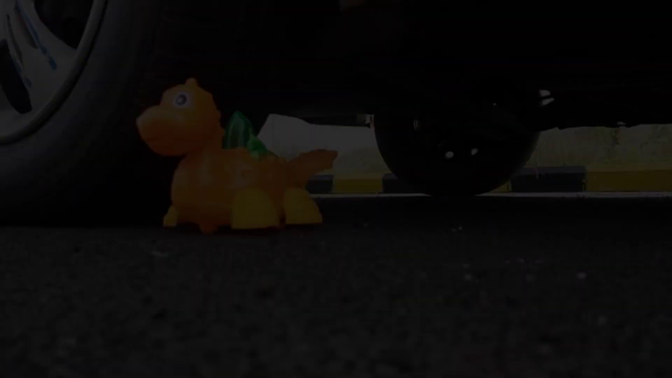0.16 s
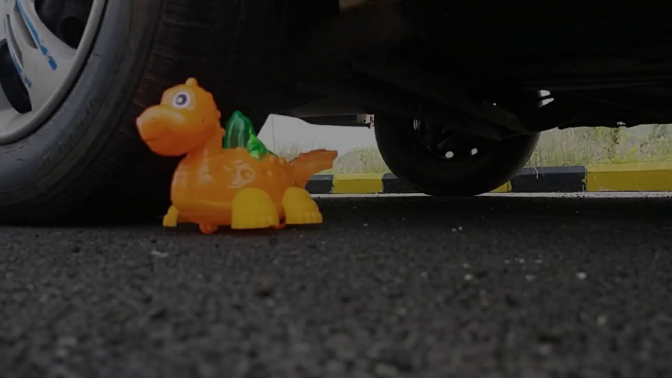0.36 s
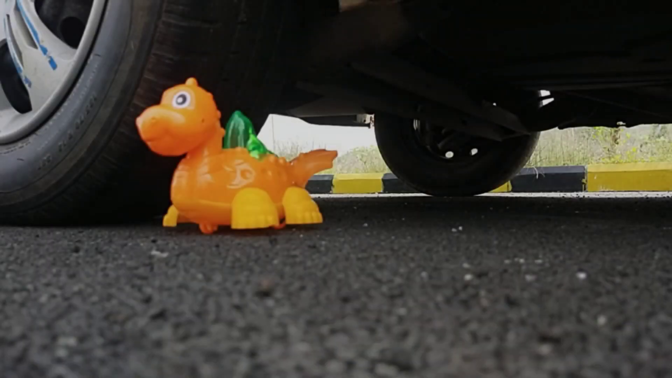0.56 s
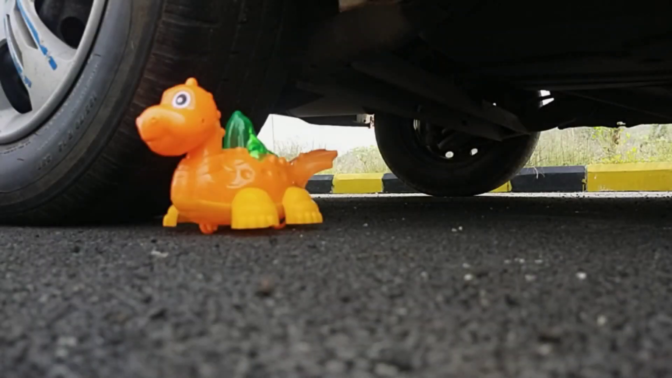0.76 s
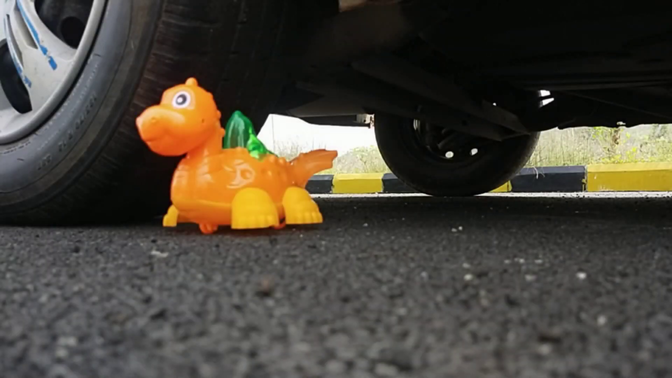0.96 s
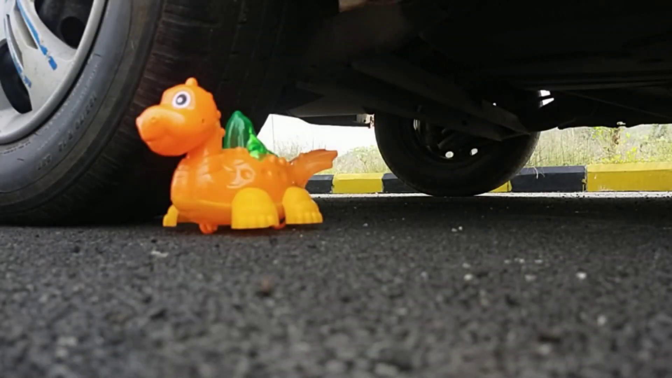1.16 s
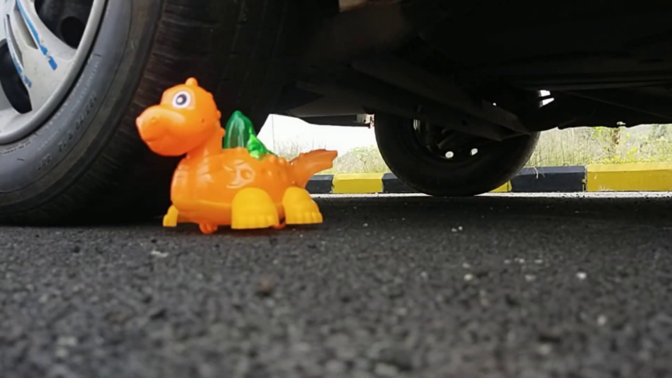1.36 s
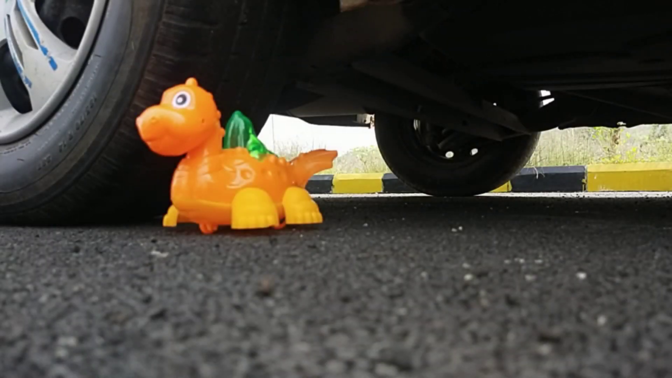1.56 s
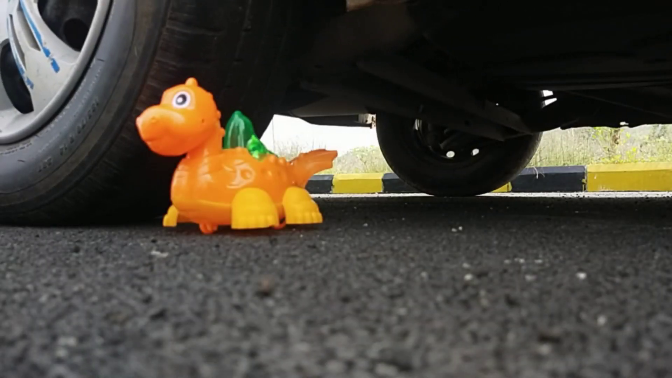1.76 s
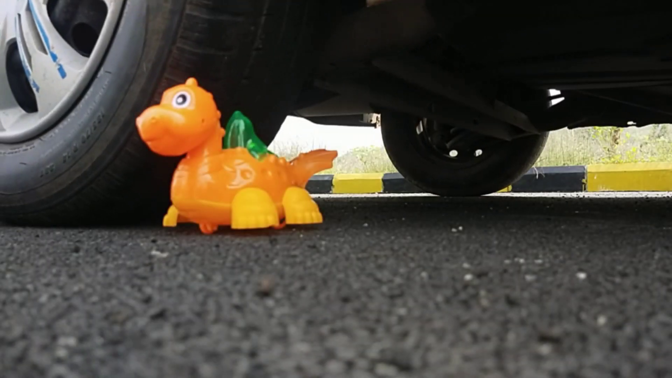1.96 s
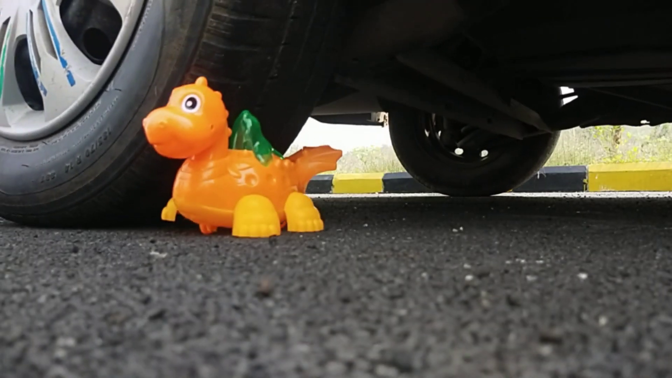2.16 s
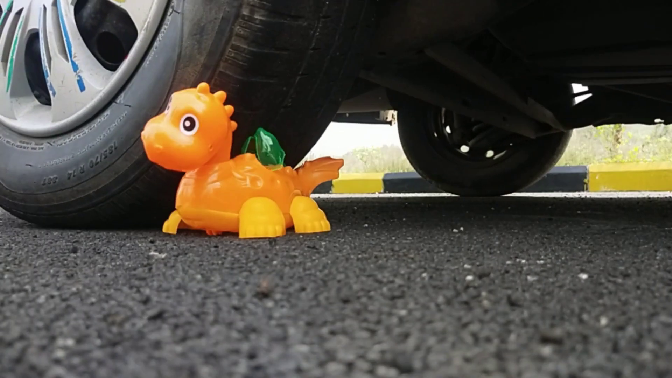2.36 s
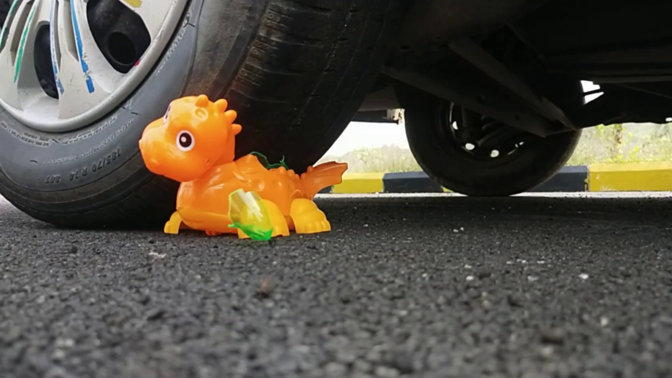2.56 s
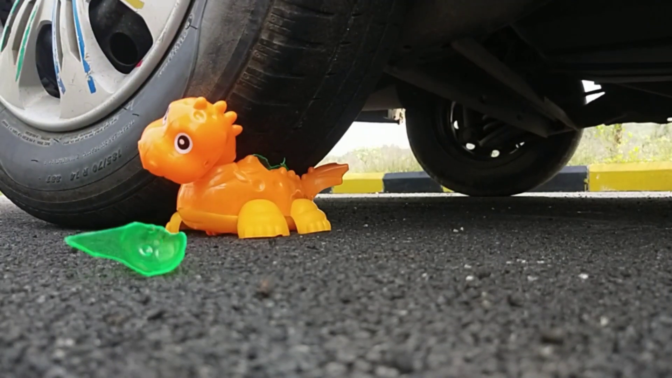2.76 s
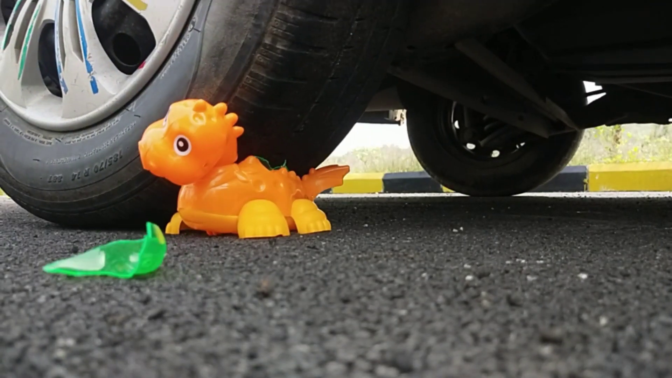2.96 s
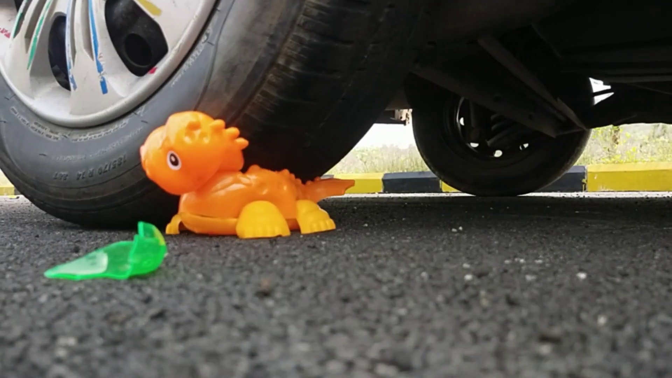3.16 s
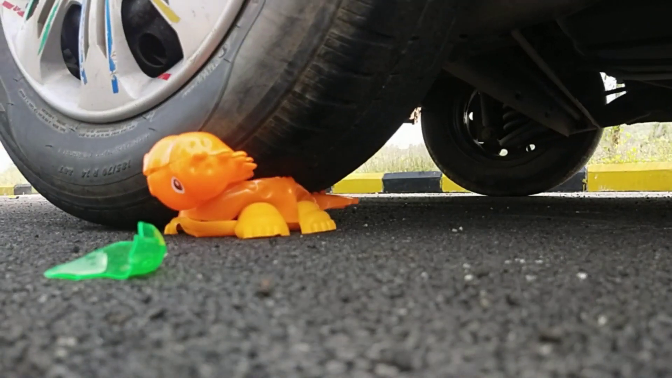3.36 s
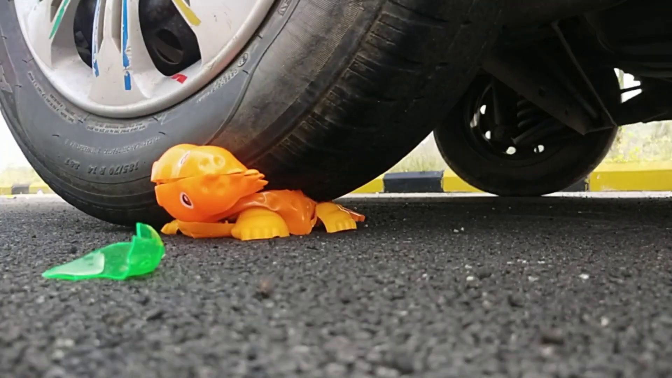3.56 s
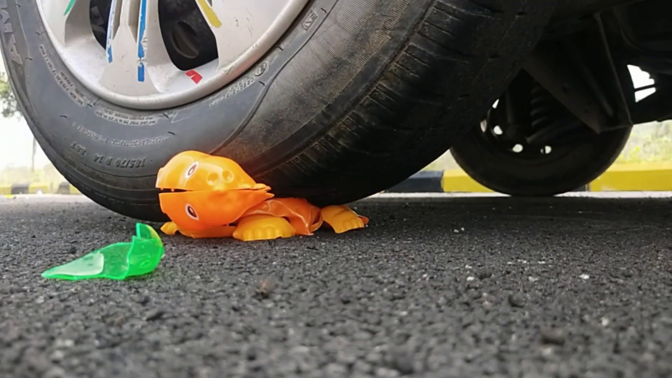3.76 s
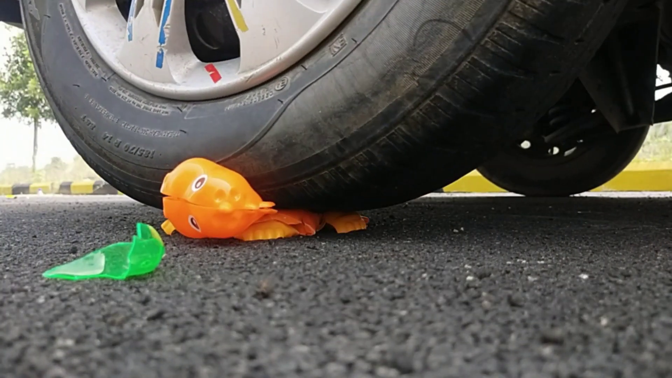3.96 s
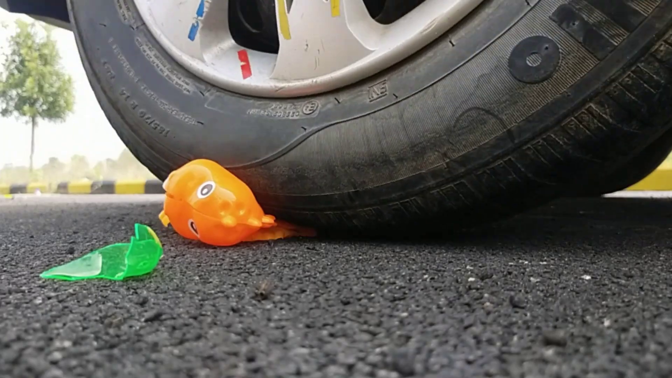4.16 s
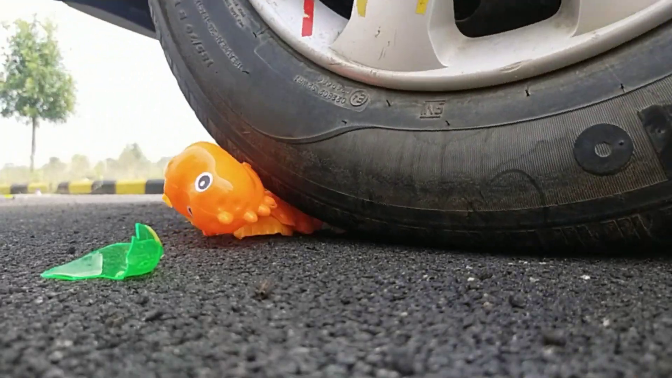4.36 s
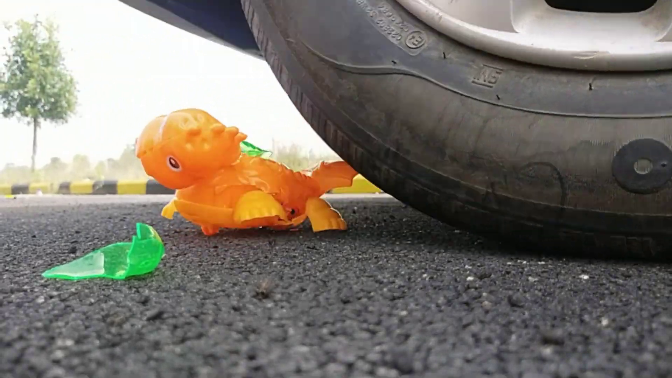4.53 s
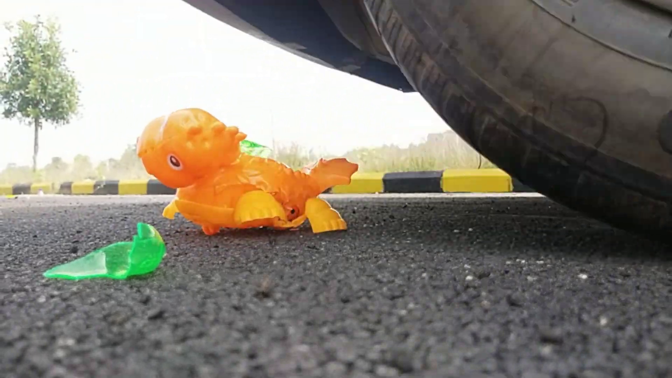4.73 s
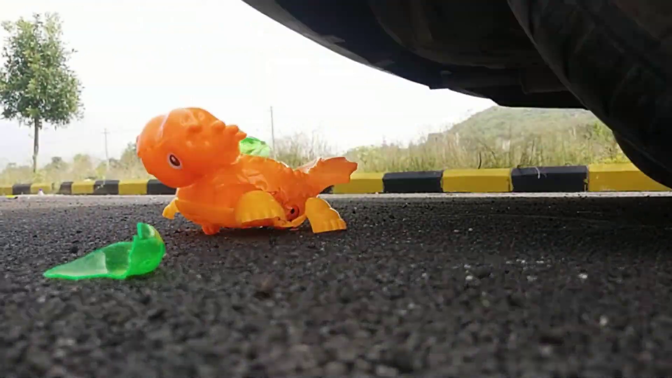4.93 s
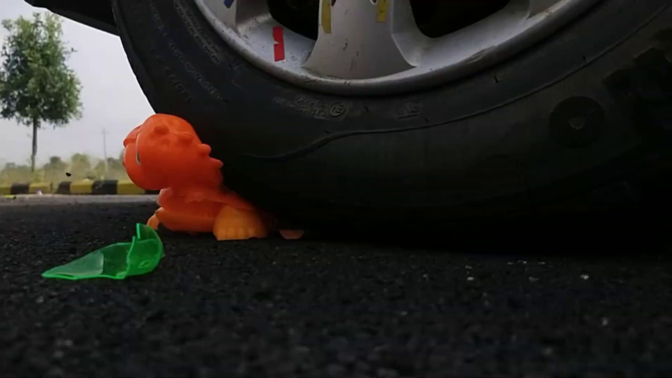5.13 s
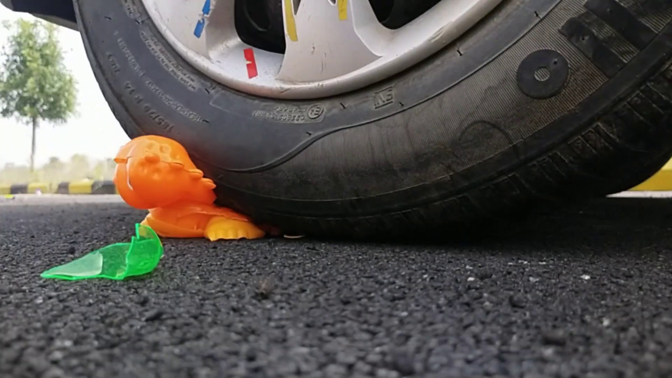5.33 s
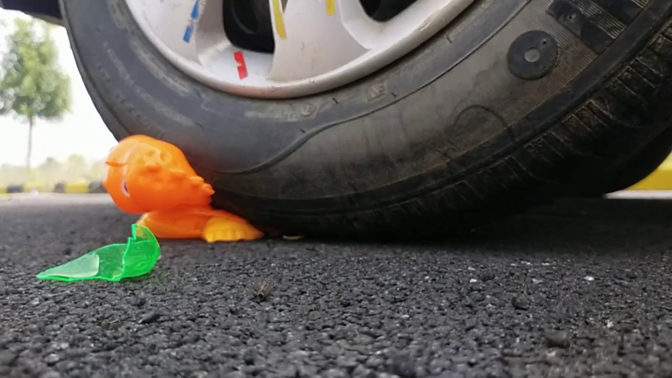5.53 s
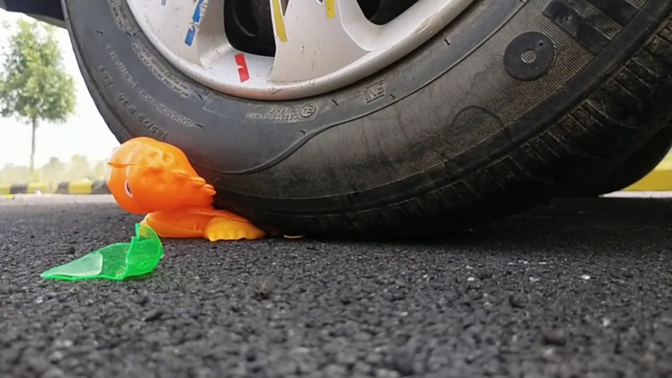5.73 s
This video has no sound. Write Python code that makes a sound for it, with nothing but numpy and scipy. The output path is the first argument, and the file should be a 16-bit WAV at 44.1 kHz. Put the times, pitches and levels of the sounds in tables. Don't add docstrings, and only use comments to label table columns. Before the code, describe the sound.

Near silence with a tiny blip at the start, then a quiet car engine fades in over the first second: low lumpy throb, exhaust hum and fine valve clatter, brighter on the right. From about 0.7 s the hum gives way to rumble as the car starts to roll. At 2.18 s brittle hollow plastic begins breaking very close: loud dry cracks until 2.7 s, with crumbling grit and a splinter tapping the asphalt at 2.6 and 2.75 s. A short lull of small ticks follows. From 3.0 to 3.95 s comes a dense run of hard snaps, creaks and hollow low thuds, deepening as the shell flattens. Around 4.25-4.6 s it pops back and scrapes free in rasping jerks, strongest at 4.43 s. Engine alone until a brief dropout near 5.17 s, then weaker cracks and crumbling to 5.56 s, ending on quiet engine. The background ducks after loud cracks.

```python
import sys
import numpy as np
from scipy import signal
from scipy.fft import rfft, irfft, next_fast_len
from scipy.io import wavfile

SR = 44100
rng = np.random.default_rng(int(sys.argv[2]) if len(sys.argv) > 2 else 0)


def output_pcm(signal):
    pcm = np.clip(np.atleast_2d(signal).T, -1, 1) * 32767
    wavfile.write(sys.argv[1], SR, np.round(pcm).astype(np.int16))


def makeup_ratio(level_db):
    decades = np.asarray(level_db, float) / 20
    return 10 ** decades


N = 255339
CUT_S = 5.18


def rms_one(x):
    return x / np.sqrt(np.mean(x ** 2) + 1e-20)


def peak_one(x):
    return x / np.abs(x).max()


def in_time(tables):
    s, *columns = np.transpose(np.vstack(tables))
    return [np.interp(np.arange(N) / SR, s, c) for c in columns]


def during(table):
    t = np.arange(N) / SR
    return (t > table[0][0]) & (t < table[-1][0])


def coloured(x, spectrum):
    size = next_fast_len(N)
    hz = np.arange(size // 2 + 1) * SR / size + 1
    spectrum_hz, spectrum_db = np.transpose(spectrum)
    gain = makeup_ratio(np.interp(np.log(hz), np.log(spectrum_hz), spectrum_db, left=-60, right=-90))
    return rms_one(irfft(rfft(x, size) * gain, size)[..., :N])


def resonance(x, hz, width_hz):
    r = np.exp(-np.pi * width_hz / SR)
    feedback = [1, -2 * r * np.cos(2 * np.pi * hz / SR), r * r]
    return signal.lfilter([(1 - r * r) / 2, 0, (r * r - 1) / 2], feedback, x)


def band(x, hz, kind):
    return signal.sosfilt(signal.butter(2, hz, kind, fs=SR, output="sos"), x)


def pair(size, alike):
    mid, side = rng.standard_normal((2, size))
    alike = np.clip(alike, 0, 1)
    return np.sqrt((1 + alike) / 2) * mid + np.sqrt((1 - alike) / 2) * side * [[1], [-1]]


def fades():
    start_s, length_s, power = 0.064, 1.0, 1.54
    out_s, in_s = .1, .11
    t = np.arange(N) / SR
    opening = np.maximum(np.clip((t - start_s) / length_s, 0, 1) ** power, makeup_ratio(-31.5))
    return opening * np.clip(np.maximum((CUT_S - t) / out_s, (t - CUT_S) / in_s), .03, 1)


# time in seconds, rumble level in dB, exhaust boom level in dB.
ENGINE_LOAD = [(0, -48, -53), (1.3, -46, -58), (1.71, -48, -57), (2.0, -46.5, -57), (2.38, -46, -47),
               (2.58, -51.5, -54), (2.7, -43.5, -46), (3.01, -39.5, -54), (3.47, -43, -59),
               (3.75, -50, -59), (3.97, -37.5, -41), (4.1, -39.5, -60), (4.23, -39, -42.5),
               (4.45, -42.5, -45), (4.71, -47.5, -40.5), (5.05, -51, -47.5), (5.4, -49.5, -49.5),
               (5.79, -47.5, -49.5)]
# frequency in Hz, density in dB per Hz.
RUMBLE = [(15, -32), (25, -13), (86, 1.5), (154, -2.5), (189, 0), (210, 0.5), (278, -5), (329, -6.5),
          (448, -2), (507, -6), (669, -1), (781, -8), (1000, -10.5), (1300, -48.5), (2200, -120)]
# frequency in Hz, density in dB per Hz.
CLATTER = [(500, 11), (900, -6.5), (1250, 0.5), (1900, -3), (2400, -8.5), (3000, -14.5), (4100, -6.5),
           (5400, -18), (6800, -12), (8200, -26.5), (12000, -34), (16500, -18)]
# frequency in Hz, width in Hz, level in dB.
BLOCK_RINGS = [
    (1250, 120, -2),
    (1430, 11, -9),
    (180.2, 20.5, -17),
]
# frequency in Hz, width in Hz, level in dB.
TAPPETS = [
    (2320, 480, -13.5),
    (3800, 560, -15),
]
# multiple of the firing rate, level in dB.
HUM = [(3, -8), (4, -9), (5, -15), (6, -18), (7, -16)]
CYLINDERS_DB = [
    0,
    -7,
    -8,
    -5,
]


def engine():
    cycle_hz, first_firing_s, skip_s = 10.005, .0595, .035
    boom_hz, boom_width_hz = 109.3, 31
    left_lag_samples, roll_off_s = 22, 0.7
    t = np.arange(N) / SR
    rumble_db, boom_db = in_time([ENGINE_LOAD])
    clatter_db = -55 + 0.25 * (rumble_db + 46.5)

    firings_s = np.arange(first_firing_s, N / SR - .01, .25 / cycle_hz)
    firings_s = np.minimum(firings_s + skip_s * (firings_s > CUT_S), N / SR - .001)
    scatter_db = rng.normal(0, 1.3, len(firings_s))
    kicks = np.zeros(N)
    kicks[(firings_s * SR).astype(int)] = makeup_ratio(np.resize(CYLINDERS_DB, len(firings_s)) + scatter_db)
    keep = np.exp(-1 / (0.0057 * SR))
    throb = signal.lfilter([1], [1, -2 * keep, keep ** 2], kicks)
    throb /= throb.mean()

    deep = pair(N, alike=0.72)
    high = pair(N, alike=0.085)
    rumble = coloured(deep * (1 + 0.15 * throb), RUMBLE)
    clatter = coloured(high * (1 + 4.5 * throb), CLATTER)
    boom = rms_one(resonance(resonance(deep, boom_hz, boom_width_hz), boom_hz, 110))
    for hz, width_hz, db in BLOCK_RINGS:
        rings = makeup_ratio(db) * rms_one(resonance(deep * (0.78 + throb), hz, width_hz))
        if hz > 500:
            clatter = clatter + rings
        else:
            rumble = rumble + rings
    ticks = signal.lfilter([1], [1, -np.exp(-1 / (0.0065 * SR))], np.sqrt(kicks)) * high
    for hz, width_hz, db in TAPPETS:
        clatter = clatter + makeup_ratio(db) * rms_one(resonance(ticks, hz, width_hz))

    standing = 1 - np.clip((t - roll_off_s) / 0.12 + .5, 0, 1)
    firing_phase = 8 * np.pi * cycle_hz * t
    hum = standing * sum(makeup_ratio(db) * np.sqrt(2) * np.sin(k * (firing_phase + k)) for k, db in HUM)
    rumble = rumble * makeup_ratio(-1.5 * standing)
    low = makeup_ratio(rumble_db + 3.0) * (rumble + hum) + makeup_ratio(boom_db - 2.0) * boom
    left, right = low * makeup_ratio([[-.6], [.6]]) + makeup_ratio(clatter_db + np.array([[.1], [5]])) * clatter
    return np.array([np.roll(left, left_lag_samples), right])


def grit(per_s, uneven_db, smooth):
    sizes = makeup_ratio(uneven_db * np.minimum(rng.exponential(1, N), 5)) * (rng.random(N) < per_s / SR)
    grains = rms_one(signal.lfilter([1], [1, -np.exp(-1 / (0.00081 * SR))], sizes))
    return (grains + smooth) * pair(N, alike=0.14)


# frequency in Hz, density in dB per Hz.
GRIT = [(180, -56), (300, 1.5), (1140, -0.5), (1460, -24), (2100, -9), (3130, -4.5), (5160, -12.5),
        (6960, -8.5), (8640, -19.5), (14700, -41.5), (16000, -35)]
# time in seconds, level in dB.
GRIND = [
    [(2.175, -49.5), (2.5, -55), (3.07, -65.5), (3.2, -50), (3.36, -49.5), (3.54, -66), (4.0, -57.5),
     (4.114, -69), (4.25, -50)],
    [(5.19, -63.5), (5.252, -50.5), (5.424, -62.5), (5.676, -83), (5.79, -92)],
]


def grind():
    level_db, = in_time(GRIND)
    pressed = sum(during(part) for part in GRIND)
    return makeup_ratio(level_db + 12.5) * pressed * coloured(grit(700, uneven_db=6, smooth=0.16), GRIT)


# time in seconds, level in dB.
DRAG = [
    (4.24, -60),
    (4.31, -54),
    (4.328, -25.5),
    (4.34, -39),
    (4.4, -26),
    (4.43, -18.5),
    (4.462, -32.5),
    (4.52, -35.5),
    (5.1, -86),
]


def drag():
    level_db, = in_time([DRAG])
    late_s = np.arange(N) / SR - 4.39
    swell_db = -41 + np.minimum(150 * late_s, -497 * late_s)
    ring_db = np.maximum(swell_db, -50 - 16 * np.abs(late_s))
    rub = grit(1500, uneven_db=3.2, smooth=.9)
    upper = makeup_ratio(np.where(late_s < .08, 0, -8)) * resonance(rub, 1450, 130)
    ring = rms_one(resonance(rub, 1260, 110) + upper)
    scrape = band(coloured(rub, GRIT), 1420, "high")
    ring_gain = makeup_ratio(ring_db + 5.0 + np.array([[-2.5], [2.5]]))
    return during(DRAG) * (makeup_ratio(level_db - 0.5) * scrape + ring_gain * ring)


# time in seconds, peak in dB, lowest mode in dB.
BOUNCES = [
    (2.61, -32, -28),
    (2.751, -52, -3),
    (2.7698, -35, -15),
]
# frequency in Hz, level in dB, decay time t60 in seconds.
SPLINTER = [(1570, 17, 0.18), (3020, -10.5, 0.11), (3600, -16, 0.045), (3850, -15, 0.045), (4270, 3, 0.13)]


def splinter():
    out, t = np.zeros(N), np.arange(900) / SR
    for s, peak_db, low_db in BOUNCES:
        skid = np.zeros(N) + 1e-18
        contact = np.exp(-t / 0.005) * rng.standard_normal(900) + 16 * (t == 0)
        skid[round(s * SR):][:900] += makeup_ratio(peak_db + 25.5) * contact
        for hz, db, t60_s in SPLINTER:
            out += makeup_ratio(db + (low_db if hz < 2000 else 0)) * resonance(skid, hz, 3.1 / t60_s)
    return out


# time in seconds, frequency in Hz.
BELLY = [
    (2.4, 860),
    (3.7, 650),
    (4.0, 546),
]
# time in seconds, peak in dB, pitch in Hz.
SLAMS = [
    (2.338, -30.5, 148),
    (3.022, -24, 219),
    (3.095, -17.5, 119),
    (3.251, -29, 423),
    (3.614, -14.5, 457),
]


def thuds():
    out, t = np.zeros(N + 2000), np.arange(2000) / SR
    pushes = [(s, db + thud_db) for s, db, _, _, thud_db in CRACKS]
    pushes += [(s, db - 23) for s, db, hz, _ in TICKS if hz < 720]
    belly_thuds = [(s, db, np.interp(s, *np.transpose(BELLY))) for s, db in pushes]
    for s, peak_db, hz in belly_thuds + SLAMS:
        knock = resonance(band(t * np.exp(-t / 0.00016), 90, "high"), hz, 0.6 * hz)
        out[round((s + .0008) * SR):][:2000] += makeup_ratio(peak_db - 2.5) * peak_one(knock)
    return out[:N]


# time in seconds, peak in dB, strongest ring in Hz, brightness in dB,
# belly thud in dB re peak.
CRACKS = [(2.178, -7, 2820, -20, -54), (2.207, -8.5, 945, -20, -30), (2.286, -14.5, 1060, 1, 2),
          (2.352, -5.5, 1040, -3.5, -6), (2.414, -1.5, 1116, -8, -29.5), (2.483, -6.5, 935, -8.5, -15.5),
          (2.67, -4, 1210, -38, -14), (3.024, -8, 770, -5, -3), (3.0934, -2, 1040, -9, -41),
          (3.208, -9.5, 1140, -28, -22), (3.272, -5, 1340, -6.5, -12), (3.33, -10, 625, -6.5, -7),
          (3.366, -5.5, 2810, -14, -21), (3.4185, -3.5, 2870, -11, -14.5), (3.461, -3.5, 3030, -6.5, -25),
          (3.549, -2, 3220, -18.5, -28), (3.615, -4, 1250, -9.5, -23), (3.71, -4.5, 618, -9.5, -4),
          (3.774, -8, 4150, -17.5, -14), (3.813, -10, 604, 2, -1), (3.935, -3, 720, -5, -4.5),
          (5.202, -22.5, 7440, -16, -49), (5.255, -17.5, 6100, -4, -38), (5.499, -15, 1430, -4.5, -38)]
# time in seconds, peak in dB, strongest ring in Hz,
# brightness in dB.
TICKS = [(2.266, -16, 1300, -10), (2.279, -7, 1240, -15), (2.53, -20.5, 1130, -24), (2.534, -22, 1000, -28),
         (2.66, -23, 3900, -24), (2.684, -13.5, 1030, -25), (2.7191, -16, 3340, -18),
         (2.847, -25.5, 1250, -22), (2.963, -27.5, 610, -26), (3.002, -8.5, 4330, -6),
         (3.042, -18, 1250, -7.5), (3.137, -33, 3060, -10), (3.158, -35, 1230, -13),
         (3.174, -21.5, 644, 3.5), (3.252, -7.5, 3400, -4.5), (3.524, -18, 1200, -23),
         (3.646, -17.5, 3320, -9), (3.664, -34, 614, -13), (3.683, -14.5, 634, -8), (3.703, -21, 624, -10),
         (3.718, -8, 3070, -25), (3.854, -21, 584, -9), (3.886, -22, 4530, -31), (3.923, -8.5, 606, -3),
         (4.002, -16, 494, -5), (5.241, -29, 6510, -6), (5.25, -36, 810, -8), (5.352, -20, 2100, -23),
         (5.425, -16.5, 3080, -28), (2.823, -26, 3810, -5)]
# time in seconds, peak in dB, strongest ring in Hz, brightness in dB.
TEARS = [(2.296, -14, 4050, -26), (2.329, -16, 2850, -14), (2.339, -19, 3180, -9), (2.434, -13, 1020, -37),
         (2.513, -33, 4230, -14), (2.55, -18.5, 3630, -6), (2.559, -24.5, 3430, -3),
         (3.196, -16.5, 1090, -5), (3.267, -8.5, 1140, -29), (3.43, -8, 1070, -28), (3.554, -10, 3530, -19),
         (3.589, -19.5, 730, -20), (3.638, -19.5, 3850, -29), (4.066, -26, 494, 2),
         (4.324, -10.5, 1360, -15.5), (4.411, -7.5, 1340, -14), (4.427, -7.5, 1470, -1),
         (4.633, -24, 1260, -6), (5.279, -24, 930, -39), (5.55, -24.5, 3160, -36), (5.559, -25, 1570, -33)]
# time in seconds, peak in dB,
# strongest ring in Hz, brightness in dB.
POPS = [(4.253, -21.5, 1400, -19), (4.268, -33, 665, 7), (4.289, -23.5, 689, -18),
        (4.316, -15.5, 1440, -10), (4.361, -19, 1440, -6), (4.378, -11, 1370, -13), (4.402, -6, 6740, -16),
        (4.421, -13, 1370, -12), (4.47, -16, 1280, -4), (4.496, -18, 6790, -13), (4.513, -14.5, 1380, -4),
        (4.539, -16.5, 1214, -8), (4.574, -23, 1340, -1), (4.662, -27.5, 1300, -17),
        (4.979, -35.5, 676, -10)]


def fractures():
    kinds = [(CRACKS, (-13.5, -24.5)), (TICKS, (-11.5, -18.5)),
             (TEARS, (-13.5, 0.69)), (POPS, (-13, -12.5))]
    return [(*row[:4], *kind) for table, kind in kinds for row in table]


# frequency in Hz, width in Hz, level in dB.
SHELL = [(620, 840, -8.5), (1250, 1020, -3.5), (1760, 2600, -19.5), (3420, 1420, 0), (4260, 1120, -1.5),
         (7060, 740, -7)]


def snaps():
    out, t = np.zeros((2, N + 4000)), np.arange(4000) / SR - .006
    for s, peak_db, hz, bright_db, hollow_db, rattle_db in fractures():
        chance = rng.standard_normal(len(SHELL) + 2)
        burst = np.exp(np.where(t < 0, t / 0.00062, -t / (0.0005 * makeup_ratio(0.79 * chance[0]))))
        run_up = makeup_ratio(rattle_db + 8.5) * np.exp(np.minimum(t, 0) / 0.0012) * (t < 0)
        decay = np.exp(-t / 0.0055) + makeup_ratio(-24.0) * np.exp(-t / 0.011)
        shape = burst + run_up + makeup_ratio(rattle_db) * decay * (t >= 0)
        shake = pair(4000, alike=0.51) * shape
        shake[:, round(.006 * SR)] += 2.74 * np.sign(chance[0])

        modes = []
        for k, (mode_hz, width_hz, db) in enumerate(SHELL):
            strength = makeup_ratio(db + 2 * chance[2 + k]) * (-1) ** k
            modes.append(strength * resonance(shake, mode_hz, width_hz))
        own = makeup_ratio(7) * resonance(shake, hz, 0.22 * hz)
        in_walls = hz >= 1800
        hollow = .4 * (modes[0] + modes[1] * (hz > 800)) + own * (not in_walls)
        walls = sum(modes[2:]) + own * in_walls
        hollow_gain = makeup_ratio(hollow_db + 12 - 5.5 * in_walls)
        body = peak_one(peak_one(walls) + hollow_gain * peak_one(hollow))

        fizz = pair(4000, alike=0.043) * shape
        top = band(fizz, 4300, "high") + makeup_ratio([[11], [-8]]) * resonance(fizz, 17700, 2800)
        pan = makeup_ratio(np.array([[1], [-1]]) * (chance[1] - 1.02))
        snap = body + makeup_ratio(bright_db + 3.5) * peak_one(top)
        at = round((s - .0048) * SR)
        out[:, at:at + 4000] += makeup_ratio(peak_db - 2.35) * snap * pan
    return out[:, :N]


LULLS = [
    2.56,
    2.7191,
    3.002,
    3.884,
    4.184,
]


def ducking():
    depth_full_db, delay_s, hold_s, deaf_s = 12.5, 0.0077, 0.0674, .025
    wakes_db = -30
    loss_db, t = np.zeros(N), np.arange(N) / SR
    loud = [row[0] for row in fractures() if row[1] > wakes_db and row[0] not in LULLS]
    sounds = np.sort([row[0] for row in BOUNCES] + loud + [N / SR + 1])
    for s in [row[0] for row in CRACKS] + LULLS:
        start = s + delay_s
        end = min(sounds[sounds > s + deaf_s][0] - .007, s + hold_s)
        depth_db = depth_full_db * (0.29 if 3.5 < s < 3.85 else 1)
        knee = start + 0.21 * max(end - start, .001)
        end = max(end, start + .001)
        slide = np.interp(t, [start, knee, end, end + 0.008], [0, 0.89 * depth_db, depth_db, 0])
        loss_db = np.maximum(loss_db, slide)
    return makeup_ratio(-loss_db)


def scene():
    near = snaps() + splinter() + thuds()
    for lag_s, db in [(.0045, -19.5), (.0095, -28)]:
        near = near + makeup_ratio(db) * band(np.roll(near[::-1], round(lag_s * SR), axis=1), 5500, "low")
    return near + ducking() * (grind() + fades() * engine()) + drag()


def band_limit(x):
    return signal.sosfilt(signal.butter(12, 16800, fs=SR, output="sos"), x)


def record(dry):
    fade_s = [.05, .058, .124, .13, .165, 5.14, 5.16, 5.185, 5.2]
    fade_db = np.interp(np.arange(N) / SR, fade_s, [1, -60, -60, -18, -0.5, 0.5, -46, -43, 4])
    x = 0.94 * np.tanh(dry * makeup_ratio(fade_db) / 0.85)
    x = signal.sosfilt(signal.cheby2(14, 80, 16600, fs=SR, output="sos"), x)
    return band_limit(x)


dry = scene()
out = record(dry)
output_pcm(out)
```